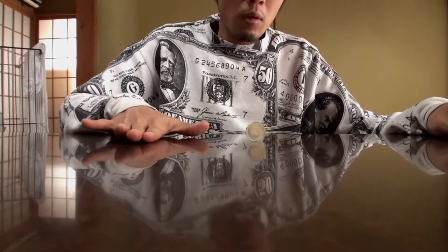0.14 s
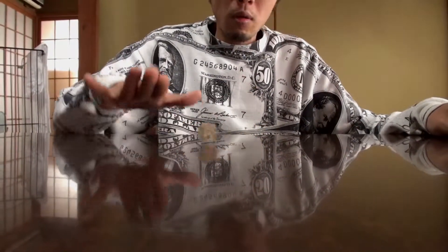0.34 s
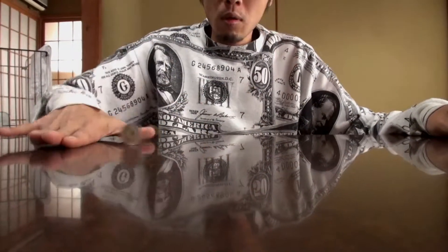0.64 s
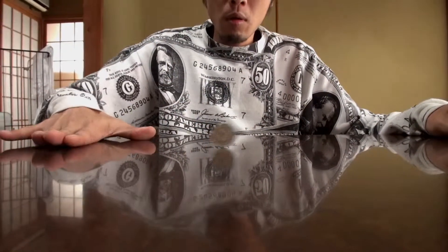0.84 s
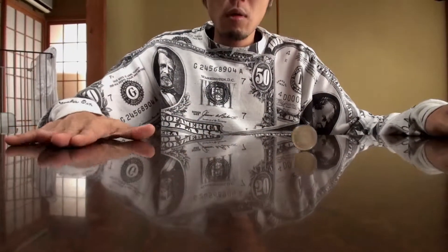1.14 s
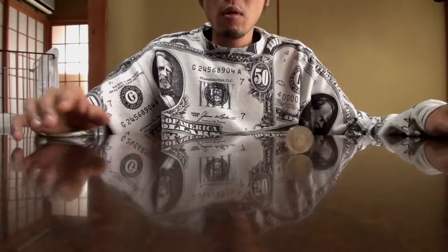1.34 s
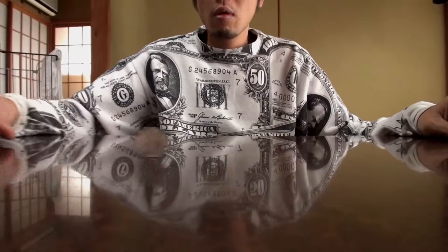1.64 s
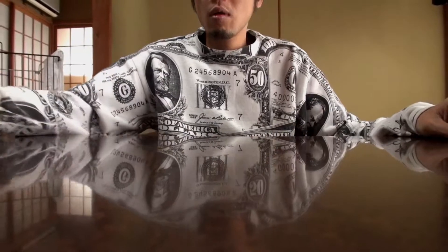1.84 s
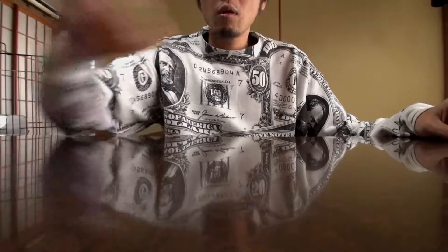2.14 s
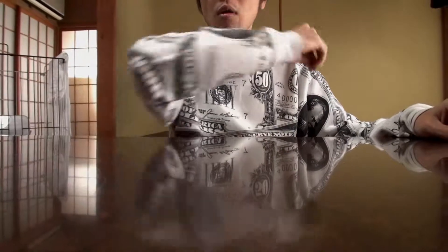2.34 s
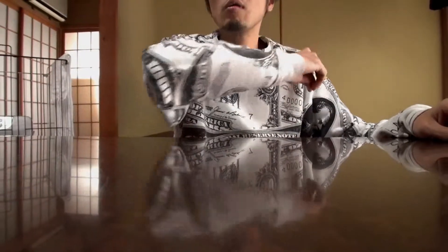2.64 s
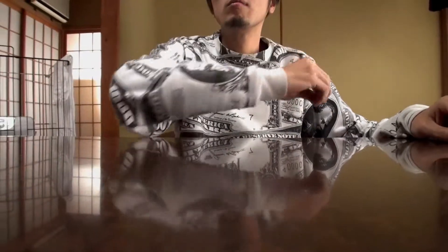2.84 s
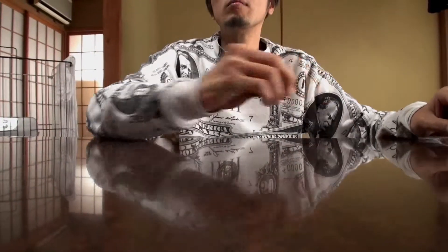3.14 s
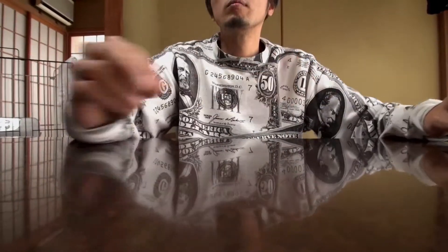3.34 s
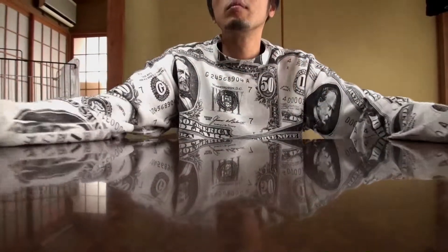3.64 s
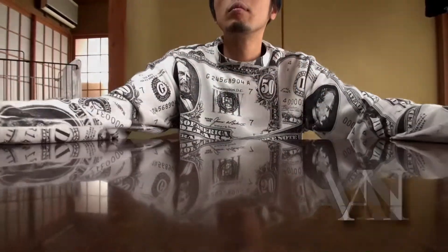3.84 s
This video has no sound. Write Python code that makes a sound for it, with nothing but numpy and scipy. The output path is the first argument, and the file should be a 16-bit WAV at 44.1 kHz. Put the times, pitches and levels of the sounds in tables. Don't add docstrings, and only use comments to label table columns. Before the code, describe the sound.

Close, stereo pickup at a tabletop in a small quiet room: dense coin rattle, one sharp hand slap over it, abrupt stop, low room hush, a tiny click, and a soft sleeve brushing the wood.

```python
import sys
import numpy as np
from scipy import signal
from scipy.fft import rfft, irfft, next_fast_len
from scipy.io import wavfile
from scipy.ndimage import uniform_filter1d, minimum_filter1d, map_coordinates

SR = 44100
rng = np.random.default_rng(int(sys.argv[2]) if len(sys.argv) > 2 else 0)


def unload_wav(signal):
    wavfile.write(
        sys.argv[1],
        SR,
        np.round(np.clip(np.atleast_2d(signal).T, -1, 1) * 32767).astype(np.int16),
    )


def level_to_linear(level):
    exponent = np.asarray(level, float) / 20
    return 10 ** exponent


N = 176400

BOARD_HZ, DULL_HZ = 108, 4500


def unit(x):
    return x / np.sqrt(np.mean(x ** 2) + 1e-20)


def along(points, hz):
    f, v = np.transpose(points)
    return np.interp(np.log(hz + 1), np.log(f + 1), v)


def level(rows):
    s, db = np.transpose(rows)
    return level_to_linear(np.interp(np.arange(N) / SR, s, db))


def wobble(rate, s):
    return map_coordinates(rng.standard_normal(int(N * rate / SR) + 4), [s * rate])


def filtered(x, response):
    m = next_fast_len(N + SR // 2)
    return irfft(rfft(x, m) * response(np.fft.rfftfreq(m, 1 / SR)), m)[..., :N]


def low_pass(f, hz):
    return hz / (hz + 1j * f)


def high_pass(f, hz):
    return 1j * f / (hz + 1j * f)


def causal(points):
    cepstrum = irfft(np.log(level_to_linear(along(points, np.fft.rfftfreq(4096, 1 / SR)))))
    cepstrum[1:2048] *= 2
    cepstrum[2049:] = 0
    pulse = irfft(np.exp(rfft(cepstrum)))[:2048]
    return pulse / abs(pulse).max()


def spikes(s, gain):
    at = np.ravel(s) * SR
    i = at.astype(int)
    g = np.ravel(gain)
    early = np.bincount(i, g * (1 + i - at), N + SR)
    late = np.bincount(i + 1, g * (at - i), N + SR)
    return (early + late)[:N]


def superposed(s, waves):
    index = (s * SR).astype(int)[:, None] + np.arange(waves.shape[1])
    return np.bincount(index.ravel(), waves.ravel(), N + SR)[:N]


def dying(t, t60):
    attack_s = .00015
    return level_to_linear(-60 * t / t60) * (1 - np.exp(-(t / attack_s) ** 2))


def ringing(s, gains, hz, t60):
    t = np.arange(SR // 6) / SR
    modes = np.sin(2 * np.pi * hz[:, None] * t) * dying(t, t60[:, None])
    return superposed(s, gains @ modes)


def flutter(s, gain, hz, t60):
    t = np.arange(SR // 12) / SR
    detuned_hz = hz * (1 + .015 * rng.standard_normal(len(s)))
    waves = gain[:, None] * np.sin(2 * np.pi * detuned_hz[:, None] * t) * dying(t, t60)
    return superposed(s, waves)


def burst(s, db, t60):
    t = np.arange(N) / SR - s
    return (t > 0) * level_to_linear(db - 60 * abs(t) / t60) * rng.standard_normal(N)


def rush(spectrum, alike):
    turn = lambda hz: np.arccos(np.clip(along(alike, hz), -1, 1)) / 2
    response = lambda hz: level_to_linear(along(spectrum, hz)) * [np.cos(turn(hz)), np.sin(turn(hz))]
    mid, side = filtered(rng.standard_normal((2, N)), response)
    return unit(np.array([mid + side, mid - side]))


def contacts():
    hops_start = [0.0062, 0.0154, 0.0256, 0.0305, 0.0404, 0.0478, 0.0546, 0.0676, 0.0745, 0.0802, 0.0888,
                  0.0955, 0.106, 0.1164, 0.1265, 0.1422, 0.147, 0.1563, 0.1641, 0.171, 0.1776, 0.187,
                  0.2047, 0.2185, 0.2302, 0.2366, 0.2488, 0.2559, 0.268, 0.2791, 0.2896, 0.299, 0.3105,
                  0.3205, 0.3325, 0.3383, 0.3441, 0.349, 0.3556, 0.3663, 0.3711, 0.3769, 0.3836, 0.3878,
                  0.397, 0.4061, 0.4146, 0.4219, 0.43, 0.4362, 0.4432]
    hops_slow = [0.4505, 0.4627, 0.4687, 0.4802, 0.4866, 0.4921, 0.5004, 0.5086, 0.5177, 0.5251, 0.5324,
                 0.5398, 0.5477, 0.5633, 0.5725, 0.5825, 0.5871, 0.5966, 0.6175, 0.6334, 0.6536, 0.66,
                 0.6682, 0.6842, 0.6988, 0.7115, 0.7238, 0.7344, 0.7407, 0.7578, 0.7777, 0.7954, 0.8077,
                 0.8214, 0.8356, 0.8483, 0.869, 0.8861, 0.9102, 0.9318, 0.9475, 0.9705, 0.9915, 1.0095,
                 1.0299, 1.0405, 1.047, 1.0562, 1.0635, 1.0761, 1.0951]
    hops_steady = [1.1068, 1.1198, 1.1327, 1.147, 1.1659, 1.187, 1.2069, 1.2247, 1.2428, 1.2619, 1.2802,
                   1.2949, 1.3098, 1.3181, 1.3317, 1.3459, 1.3554, 1.3686, 1.3778, 1.3895, 1.3963, 1.4017,
                   1.4132, 1.4217, 1.4365, 1.4447, 1.4676, 1.4745, 1.4793, 1.4937, 1.5072, 1.5189, 1.5278,
                   1.538, 1.5551, 1.5661, 1.5793, 1.5918]
    hops_late = [1.6041, 1.618, 1.6312, 1.6396, 1.6545, 1.6753, 1.6842, 1.6908, 1.6979, 1.7058, 1.7135,
                 1.7203, 1.7316, 1.7398, 1.7496, 1.7567, 1.7629, 1.7702, 1.7821, 1.7902, 1.797, 1.8062,
                 1.815, 1.8196, 1.8581, 1.8802, 1.8997, 1.9065, 1.9141, 1.9233, 1.9315, 1.938, 1.9563,
                 1.9707, 1.9958, 2.0036, 2.0146]
    chatter = [0.0009, 0.0604, 0.1322, 0.2631, 0.3614, 0.4584, 0.5559, 0.5918, 0.6042, 0.6119, 0.6223,
               0.6437, 1.3835, 1.4078, 1.4274, 1.4316, 1.456, 1.4615, 1.4855, 1.5439, 1.6223, 1.6473,
               1.6596, 1.6643, 1.669, 1.8308, 1.8372, 1.8445, 1.8515, 1.8643, 1.8691, 1.8735, 1.8875,
               1.8946, 1.9447, 1.95, 1.9636, 1.9756, 1.9806, 1.9853, 2.0086]
    hard_db, soft_db, spread_db = -3, -4, 0.8
    hard = hops_start + hops_slow + hops_steady + hops_late
    s = np.array(hard + chatter)
    soft = np.arange(len(s)) >= len(hard)
    db = hard_db + soft_db * soft + spread_db * rng.standard_normal(len(s))
    order = np.argsort(s)
    return s[order], db[order]


def rim_modes(s, db):
    # pitch_hz, level_db, t60_s
    coin_modes = [(13318, -67, .3), (7350, -50, .015), (6600, -50, .012)]
    hz, mode_db, t60 = np.transpose(coin_modes)
    gains = level_to_linear(db[:, None] + mode_db) * rng.standard_normal((len(s), len(hz)))
    return ringing(s, gains, hz, t60)


def skid(contact_s, bright_db):
    long_flight_s, lead_s, width_s = .012, .005, .0025
    graze_db, graze_hz, grit_db, grit_hz = -28, 4200, -45, 6580
    t = np.arange(-400, 400) / SR

    def band(hz, width):
        bell = lambda f: np.exp(-(np.log((f + 1) / hz) / width) ** 2)
        return unit(filtered(rng.standard_normal(N), bell))

    def gate(s, db):
        strokes = spikes(s, level_to_linear(db + 2.4 * rng.standard_normal(len(s))))
        return np.convolve(strokes, np.exp(-(t / width_s) ** 2), "same")

    landings = contact_s[1:][np.diff(contact_s) > long_flight_s]
    graze = gate(landings - lead_s, graze_db) * band(graze_hz, 0.54)
    grit = gate(contact_s + 0.00083, grit_db + bright_db) * band(grit_hz, 0.18)
    return graze + grit


def taps(s, size, wander, common, own):
    # pitch_hz, level_db
    tap_colour = [(60, -65), (250, -19.5), (800, -16.5), (2000, -6.5), (5000, -13.5), (6200, -24.5),
                  (7600, -40), (16000, -48)]
    tap_db, echo_db, echo_t60, echo_hz = 1.5, -10.5, .032, 5000
    first_s, span_s, drift_s, shared = 0.0005, .035, 0.0003, 0.95
    lag = first_s + span_s * np.linspace(0, 1, 90) ** 2
    sign = np.sqrt(shared) * common[0] + np.sqrt(1 - shared) * own[0]
    slide = drift_s * wander @ (common[1:] + 0.097 * own[1:]) * np.minimum(1, lag / 0.0042)
    gains = size[:, None] * sign * level_to_linear(echo_db - 60 * lag / echo_t60)
    echoes = spikes(s[:, None] + abs(lag + slide), gains)
    train = spikes(s, size) + filtered(echoes, lambda f: low_pass(f, echo_hz))
    return level_to_linear(tap_db) * signal.fftconvolve(train, causal(tap_colour))[:N]


def board_modes(s, size, favoured_hz, drift):
    # pitch_hz, level_db
    table_modes = [(288, -12), (402, -20), (560, -13), (640, -12), (972, -22), (1295, -9.5), (1500, -7.5),
                   (1904, -5), (2290, -10.5), (2680, -13)]
    ring_db, favour_db, favour_width_hz = -17, 7.5, 204
    hz, mode_db = np.transpose(table_modes)
    near = np.exp(-((hz - favoured_hz[:, None]) / favour_width_hz) ** 2)
    gains = size[:, None] * level_to_linear(ring_db + mode_db + favour_db * near + 3 * drift)
    return ringing(s, gains, hz, .05 * (hz / 1900) ** -.3)


def low_flutter(s, size):
    # start_s, pitch_hz, level_db
    low_path = [(0, 898, -25), (0.6, 900, -27), (.72, 870.5, -21.5), (1.379, 856, -16.5), (1.6, 798, -24),
                (2.017, 903, -18.5)]
    when, hz, db = np.transpose(low_path)
    return flutter(s, size * level_to_linear(np.interp(s, when, db)), np.interp(s, when, hz), .08)


def coin():
    # start_s, left_hz, right_hz, upper_hz, pan_db, bright_db, ring_db, upper_db, strength_db
    places = [(0, 1882, 2300, 2470, -1, 7, 1.5, -16.5, -6),
              (0.202, 1990, 2090, 2610, -0.5, 0.5, -5.5, -10.5, -1),
              (.4, 1870, 1870, 2640, 1, -1.5, -4, -15, -2),
              (0.571, 1606, 1728, 2730, 1.5, -3.5, -4, -6, -1.5),
              (0.659, 1592, 1597, 2690, 1, 8, -9, -9, -3),
              (0.738, 2315, 2240, 2715, 0, 3.5, -9, -12.5, -0.5),
              (0.949, 2180, 2236, 2880, 2, 3.5, -6, -38.5, 5),
              (1.04, 1948, 1885, 2940, 0, 7.5, -4, -13.5, -4),
              (1.202, 1970, 1925, 2894, 0, -2.5, -6.5, -4, -1.5),
              (1.349, 1900, 1830, 2610, -0.5, 2, -9.5, -9, -4.5),
              (1.448, 1880, 1595, 2330, 0, 3.5, -7.5, -11.5, -3),
              (1.621, 1597, 1500, 2270, 1, -1, -9, -15, -0.5),
              (1.678, 1546, 1674, 2930, 2.5, 0.5, -10, -10.5, -3),
              (1.801, 1963, 1817, 2860, 1.5, -3.5, -6, -9.5, 0.5),
              (1.872, 1647, 1570, 2874, 4, -6.5, -9, -12.5, -1),
              (2.022, 1694, 1604, 2720, 2, -2, -6, -8, -0.5)]
    flutter_db = -1.5
    s, db = contacts()
    when, *cols = np.transpose(places)
    at_contacts = [np.interp(s, when, c) for c in cols]
    left_hz, right_hz, upper_hz, pan_db, bright_db, ring_db, upper_db, strength_db = at_contacts
    db = db + strength_db
    brightness = level(list(zip(when, cols[4])))
    common, *own_chances = rng.standard_normal((3, 3, 90))
    wander = np.array([wobble(2.041, s), wobble(2, s)]).T
    drift = np.array([wobble(3.275, s) for _ in range(10)]).T
    rim = rim_modes(s, db + bright_db) + skid(s, bright_db)
    out = []
    for side, favoured_hz, own in zip((0.89, -2.7), (left_hz, right_hz), own_chances):
        size = level_to_linear(db + side * pan_db / 2)
        top = taps(s, size, wander, common, own)
        top = top + board_modes(s, size, favoured_hz, drift)
        top = top + flutter(s, size * level_to_linear(flutter_db + ring_db), favoured_hz, .03)
        top = top + flutter(s, size * level_to_linear(upper_db), upper_hz, .032)
        top = top + low_flutter(s, size)
        treble = filtered(top, lambda f: 1 / (1 + (DULL_HZ / (f + 1)) ** 4))
        out.append(top + treble * (brightness - 2) + rim)
    return filtered(np.array(out), lambda f: high_pass(f, BOARD_HZ) ** 2)


def hush():
    # pitch_hz, level_db
    hush_colour = [(30, -14.5), (80, -19), (170, -11), (400, -7), (660, -16), (1200, -14), (5000, -27),
                   (8000, -33), (15000, -37.5)]
    # start_s, level_db
    hush_curve = [(2.15, -55.5), (2.69, -59.5), (4.0, -60)]
    # pitch_hz, likeness
    hush_alike = [(60, 1), (260, 1), (1120, 0.61), (4810, 0.79)]
    swell = level_to_linear(4.0 + 0.98 * wobble(10, np.arange(N) / SR))
    return level(hush_curve) * swell * rush(hush_colour, hush_alike)


def palm():
    # start_s, level_db
    slaps = [
        (0.5994, -26),
        (0.6055, 6),
        (0.616, -13.5),
        (0.643, -7),
        (0.646, -6.5),
    ]
    # pitch_hz, level_db, t60_s
    thud_modes = [(129, -8.5, 0.022), (167, 4.5, 0.034), (288, -1, 0.1), (401, -7, 0.072), (565, -6, 0.046),
                  (850, -10, 0.029), (1272, 4.5, 0.033)]
    crack_db, crack_t60, skin_hz = 7.5, 0.085, 1089
    s, db = np.transpose(slaps)
    hz, mode_db, t60 = np.transpose(thud_modes)
    spread_db = 2 * rng.standard_normal((len(s), len(hz)))
    thud = ringing(s, level_to_linear(db[:, None] + mode_db - 10.0 + spread_db), hz, t60)
    crack = sum(burst(start, loud + crack_db, crack_t60) for start, loud in slaps)
    skin = lambda f: (low_pass(f, skin_hz) * high_pass(f, BOARD_HZ)) ** 2 * low_pass(f, DULL_HZ)
    return (thud + filtered(crack, skin)) * level_to_linear([[1], [-1]])


def sleeve():
    # pitch_hz, level_db
    cloth_colour = [(800, -20), (2500, -8), (6000, -7), (11000, -17), (14500, -56)]
    # start_s, level_db
    stroke = [(3.0, -63.5), (3.55, -58.5), (3.63, -54.5), (3.78, -52), (3.88, -64.5)]
    uneven = level_to_linear(1.1 * wobble(40, np.arange(N) / SR))
    return level(stroke) * uneven * rush(cloth_colour, [(3000, 0.28)])


def tick():
    start_s, click_db = 3.3, -40
    click = burst(start_s, click_db, .006) + burst(start_s + 0.00056, click_db + 9.0, 0.027)
    return filtered(click, lambda f: low_pass(f, 5000) ** 4)


def room(x):
    # pitch_hz, t60_s
    room_decay = [(200, 0.32), (2000, .22), (8000, 0.21)]
    hz, t, z = signal.stft(rng.standard_normal((2, SR // 2)), SR, nperseg=256)
    decay = level_to_linear(-60 * t / along(room_decay, hz)[:, None])
    tail = signal.istft(z * decay, SR, nperseg=256)[1]
    delayed = np.pad(x, ((0, 0), (200, 0)))
    return signal.fftconvolve(delayed, tail / np.linalg.norm(tail[0]), axes=1)[:, :N]


def scene():
    room_db = -11.5
    near = coin() + palm() + tick()
    return near + level_to_linear(room_db) * room(near) + hush() + sleeve()


def top_cut(x):
    return signal.sosfilt(signal.butter(12, 15800, fs=SR, output="sos"), x)


def record(dry):
    look_s, limit_db, mic_hz = .002, -2.5, 91.5
    need = np.minimum(1, level_to_linear(limit_db) / (abs(dry).max(0) + 1e-9))
    width = max(3, int(look_s * SR))
    held = dry * uniform_filter1d(minimum_filter1d(need, 2 * width), width)
    mix = filtered(held, lambda f: high_pass(f, mic_hz) ** 4)
    return top_cut(mix)


dry = scene()
out = record(dry)
unload_wav(out)
```